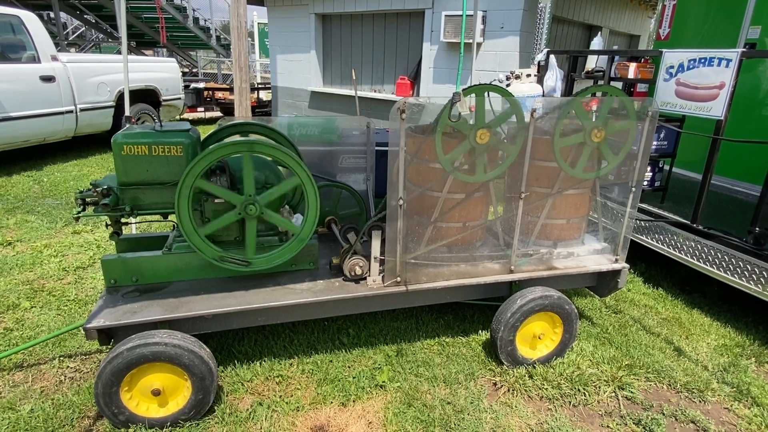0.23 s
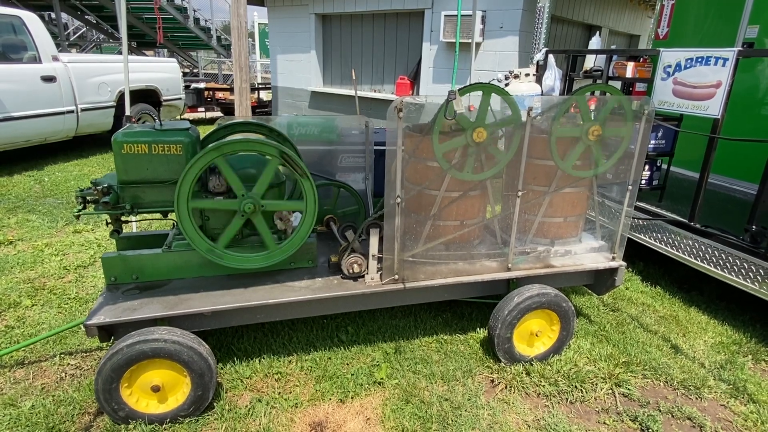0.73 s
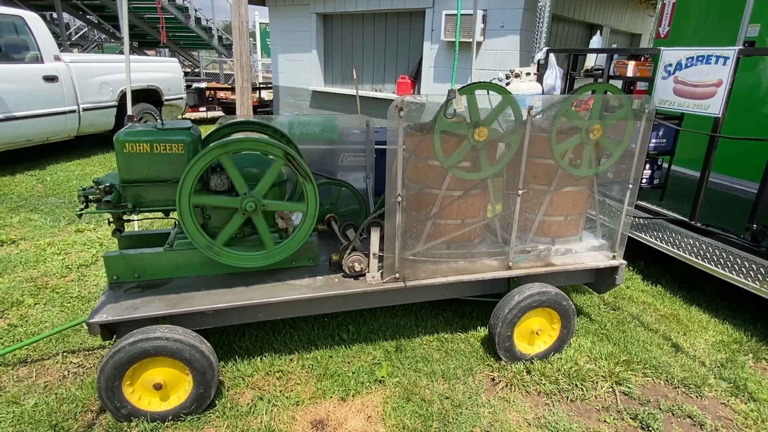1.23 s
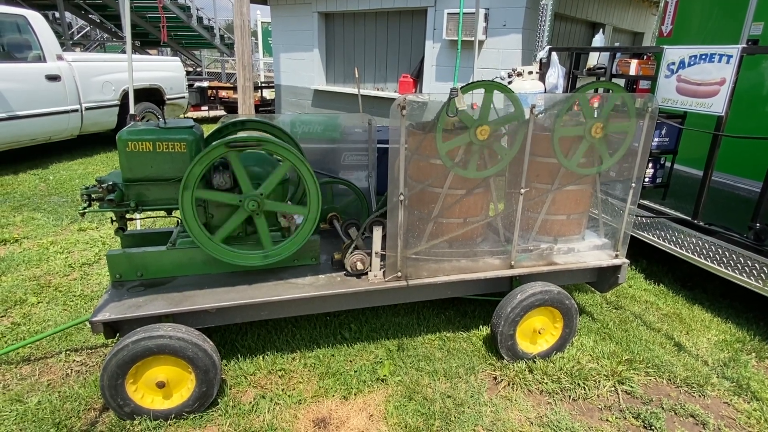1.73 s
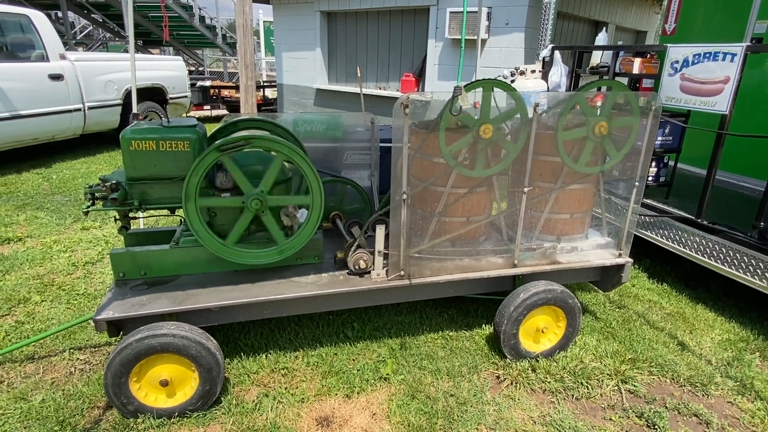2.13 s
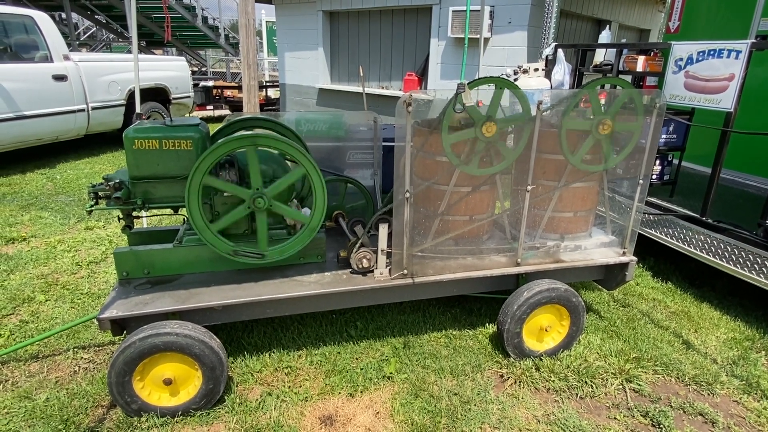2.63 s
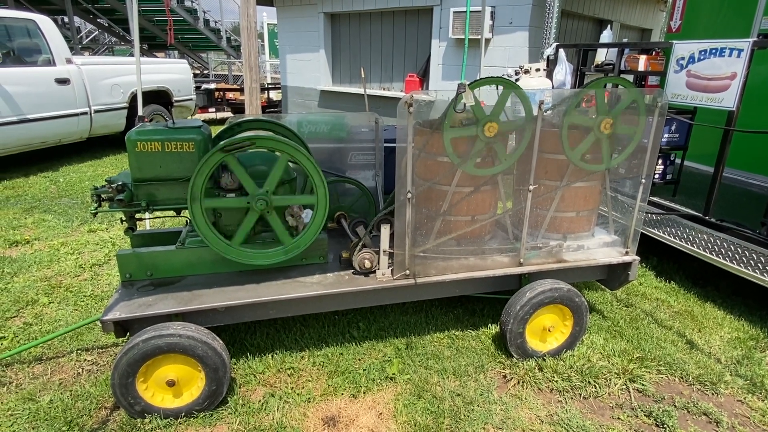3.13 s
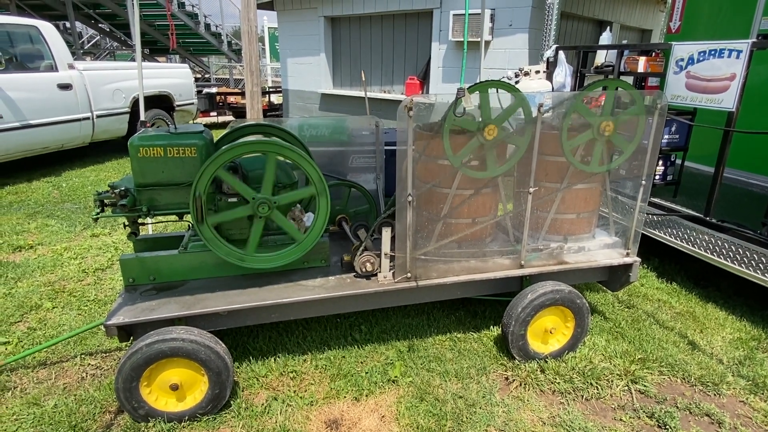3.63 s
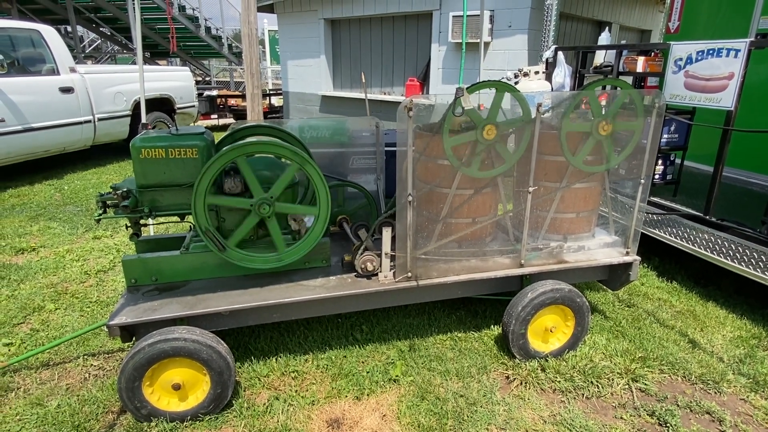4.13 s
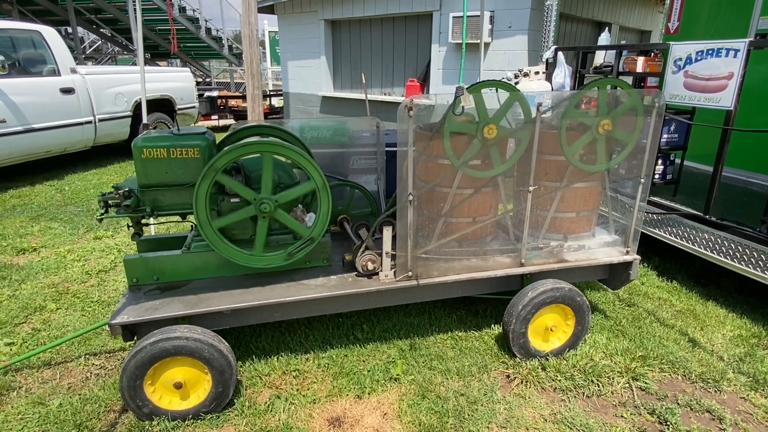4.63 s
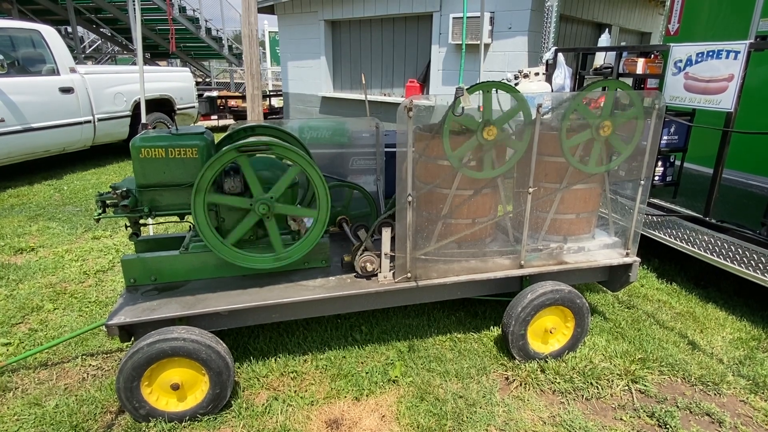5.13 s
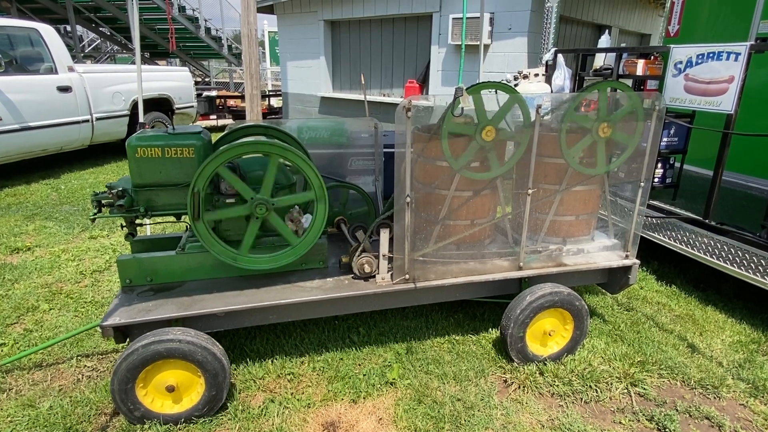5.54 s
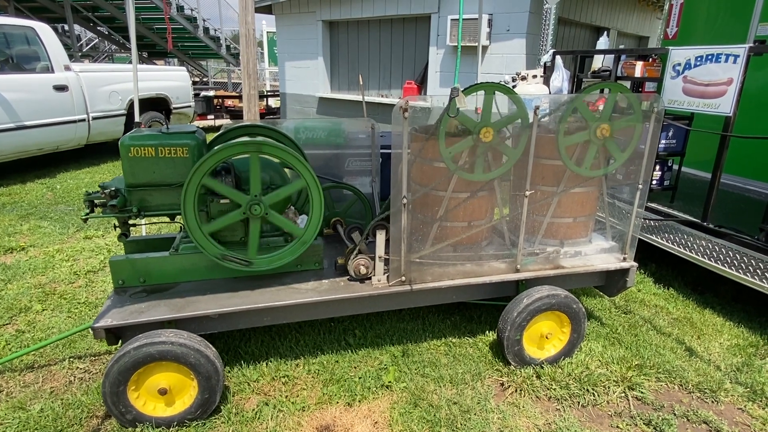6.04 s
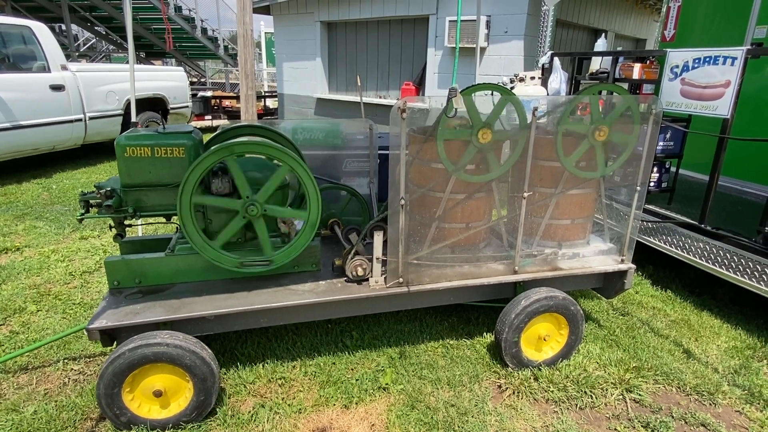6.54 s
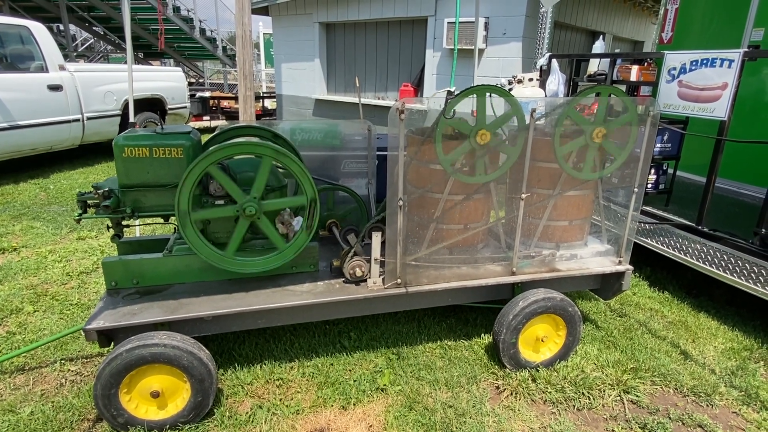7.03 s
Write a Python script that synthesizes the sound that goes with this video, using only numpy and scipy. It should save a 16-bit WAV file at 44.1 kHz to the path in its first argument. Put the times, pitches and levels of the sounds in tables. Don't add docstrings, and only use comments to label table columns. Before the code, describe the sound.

An old single-cylinder engine coasts outdoors with rapid breathy chuffs, three times sucking in air, snapping and blasting exhaust, over a diesel idle.

```python
import sys
import numpy as np
from scipy import signal
from scipy.fft import rfft, irfft, next_fast_len
from scipy.io import wavfile
from scipy.ndimage import uniform_filter1d, minimum_filter1d, map_coordinates

SR = 44100
rng = np.random.default_rng(int(sys.argv[2]) if len(sys.argv) > 2 else 0)


def persist_wave(psi):
    counts = np.round(np.clip(psi, -1, 1) * 32767).astype(np.int16)
    wavfile.write(sys.argv[1], SR, np.atleast_2d(counts).T)


def to_linear_factor(level_db):
    exponent = np.asarray(level_db, float) / 20
    return 10 ** exponent


N = 321048


def unit(x):
    return x / np.sqrt(np.mean(x ** 2) + 1e-20)


def along(points, hz):
    f, v = np.transpose(points)
    return np.interp(np.log(hz + 1), np.log(f + 1), v)


def curves(rows):
    s, *cols = np.transpose(rows)
    return [np.interp(np.arange(N) / SR, s, c) for c in cols]


def wobble(rate_hz):
    knots = rng.standard_normal(int(N * rate_hz / SR) + 4)
    return map_coordinates(knots, [np.arange(N) * rate_hz / SR])


def filtered(x, response):
    m = next_fast_len(N + 8192)
    return irfft(rfft(x, m) * response(np.fft.rfftfreq(m, 1 / SR)), m)[..., :N]


def modes(table, f):
    total = 0
    for k, (c, width, db) in enumerate(table):
        total = total + (-1) ** k * to_linear_factor(db) * 1j * f * width / (c * c - f * f + 1j * f * width)
    return total


def air(response, grain_db):
    grain = to_linear_factor(grain_db * wobble(900))
    return unit(filtered(rng.standard_normal((2, N)) * grain, response))


def gate(start_s, rise_s, hold_s, t60_s):
    t = np.arange(N) / SR - start_s
    return np.clip(t / rise_s, 0, 1) ** 2 * to_linear_factor(-60 * np.clip(t - hold_s, 0, None) / t60_s)


def knock(start_s, hz, sweep, fall_s, t60_s):
    t = np.clip(np.arange(N) / SR - start_s, 0, .2)
    phase = 2 * np.pi * hz * (t + sweep * fall_s * (1 - np.exp(-t / fall_s)))
    return np.sin(phase) * to_linear_factor(-60 * t / t60_s) * (t < .2)


# t/s, level/dB
LOAD = [(0, -33), (.3, -35.5), (.62, -40), (1, -38), (1.3, -38.5), (1.5, -36), (2.13, -33.5), (2.3, -46),
        (3.3, -45.5), (4.44, -49.5), (5.2, -34.5), (5.7, -33), (6.08, -33.5), (6.26, -42), (6.58, -30),
        (6.77, -38.5), (7.28, -46)]
# t/s, level/dB
YARD = [(0, -38.5), (.9, -41.5), (1.1, -42.5), (2.3, -40.5), (2.62, -49), (3.2, -50), (3.45, -52),
        (3.75, -52.5), (4.25, -56), (4.7, -56.5), (5.4, -45), (5.7, -40), (5.9, -42), (6.3, -41),
        (6.6, -41), (7.28, -50)]


def busy():
    return curves(LOAD)[0] + 40, curves(YARD)[0] + 47


# first stroke t/s, slowing/(s per turn squared)
COASTS = [
    (-1.842, .00068),
    (.8489, .00068),
    (3.5541, .00075),
    (5.9792, .00063),
]


def strokes():
    turn_s = .12312
    turn = np.arange(24)
    ends = [row[0] for row in CHARGES] + [N / SR + turn_s]
    times, turns = [], []
    for (first_s, slowing), end in zip(COASTS, ends):
        run = first_s + turn_s * turn + slowing * turn ** 2
        times.append(run[run < end])
        turns.append(turn[run < end])
    return np.concatenate(times), np.concatenate(turns)


# t/s, flow/dB, whistle/dB
BREATHING = [(0, -27, -3), (.3, -28, -4), (.45, -29, 1.5), (.97, -26, 0.5), (1.35, -27, -4.5),
             (2.1, -28.5, -2), (3.1, -27, -5.5), (3.8, -26, -4.5), (4.25, -29, -8), (4.85, -31.5, -8.5),
             (5.15, -29, -5.5), (5.6, -29.5, -4), (6.2, -25, -7), (7.28, -28.5, -7)]
# f/Hz, level/(dB per Hz)
BREATH = [(300, -41), (1000, -4.5), (2000, 0.5), (4000, 0), (6500, -3.5), (8800, -1.5), (12000, -6.5),
          (15700, -18.5), (16000, -60)]
# f/Hz, width/Hz, level/dB
PORT = [(3460, 100, -34), (5460, 83, -7), (6880, 130, -0.5)]
# f/Hz, width/Hz, level/dB
PIPE = [(506, 59, 5.5), (930, 145, 4.5), (1283, 105, 3.5), (1807, 56, 7), (2640, 900, -12)]
# f/Hz, width/Hz, level/dB
WHISTLE = [(4630, 113, 0.5), (4712, 110, -2), (4990, 210, -2.5)]


def coasting():
    s, turn = strokes()
    t = np.arange(N) / SR
    level_db, whistle_db = (np.interp(s, t, c) for c in curves(BREATHING))
    level_db = level_db - 4 * (turn == 0)
    pipe_db = .55 * np.interp(s, t, busy()[1]) - 5.5 * (turn % 2 == 0)

    near = np.round(np.interp(t, s, np.arange(len(s)))).astype(int)
    u = t - s[near]
    push = np.exp(-np.abs(u / np.where(u < 0, .021, .025)) ** np.where(u < 0, 4.5, 2.2))
    edge = np.exp(-np.abs((u + .005) / .02) ** 3.5) + .2 * np.exp(-((u - .04) / .03) ** 2)
    draw = np.exp(-((np.abs(u) - .068) / .031) ** 2) * np.where(u < 0, .8, 1.05)

    jet = air(lambda f: to_linear_factor(along(BREATH, f)) * (1 + np.abs(modes(PORT, f))), grain_db=-2.5)
    back = air(lambda f: to_linear_factor(along(BREATH, f)) * f / 8000, grain_db=-2.5)
    pipe = to_linear_factor(pipe_db[near] - 2) * air(lambda f: modes(PIPE, f), grain_db=0)
    whistle_gain = to_linear_factor(whistle_db[near] + 1.5 + .44 * wobble(50))
    whistle = whistle_gain * air(lambda f: modes(WHISTLE, f), grain_db=-4)
    gain = to_linear_factor(uniform_filter1d(level_db[near], size=400) - 6)
    return gain * to_linear_factor(wobble(70)) * (push * (jet + pipe) + edge * whistle + to_linear_factor(-7) * draw * back)


# order, level/dB
IDLE_LOW = [(4, 9.5), (5, 2), (6, -46), (7, 4)]
# order, level/dB
IDLE_BOOM = [(8, -6), (9, -16.5), (10, -10), (11, -2), (12, 0.5), (13, -14), (14, -24), (20, -32.5),
             (22, -17)]
# t/s, level/dB
THROB = [(0, -37), (.55, -36), (1, -45.5), (3.2, -45), (3.9, -50), (5.6, -50), (6.1, -45), (7.28, -50)]


def diesel():
    idle_hz = 13.46
    cycle = 2 * np.pi * idle_hz * np.arange(N) / SR + .041 * wobble(3.17)

    def stack(table):
        total = 0
        for order, db in table:
            gain = to_linear_factor(db + .35 * wobble(2.59))
            total = total + gain * np.sin(order * cycle + rng.uniform(0, 2 * np.pi))
        return unit(total)

    def engine():
        return to_linear_factor(curves(THROB)[0]) * stack(IDLE_LOW) + to_linear_factor(curves(LOAD)[0] - 1) * stack(IDLE_BOOM)

    return np.array([engine(), .23 * engine()])


# f/Hz, level/(dB per Hz)
RUMBLE = [(30, -25), (50, -10), (85, -4), (160, -6.5), (230, -7.5), (380, -8.5), (550, -33.5)]
RATTLE = [(330, -20.5), (520, -1), (680, 0), (850, 1.5), (1050, -5.5), (1400, -37)]
WHIRR = [(900, -9), (1350, 3), (1650, -0.5), (2300, -2.5), (2750, -5.5), (4000, -6.5), (6500, -6.5),
         (9000, -22)]
HISS = [(4000, -17), (7000, -4), (9000, 13), (11000, 3), (15700, -1), (16000, -50)]


def around():
    load_db, yard_db = busy()
    rumble_db = -45.5 + .45 * load_db + .46 * yard_db + 1.74 * wobble(25)
    rattle_db = -43 + yard_db + 2.03 * wobble(40)
    whirr_db = -36.5 + .44 * yard_db + .05 * load_db + 1.2 * wobble(15)
    hiss_db = -49.5 - .73 * yard_db + .54 * wobble(17)
    rumble = to_linear_factor(rumble_db) * air(lambda f: to_linear_factor(along(RUMBLE, f)), grain_db=2)
    rattle = to_linear_factor(rattle_db) * air(lambda f: to_linear_factor(along(RATTLE, f)), grain_db=1)
    whirr = to_linear_factor(whirr_db) * air(lambda f: to_linear_factor(along(WHIRR, f)), grain_db=1.54)
    hiss = to_linear_factor(hiss_db) * air(lambda f: to_linear_factor(along(HISS, f)), grain_db=5.5)
    return rumble + rattle + whirr + hiss


# t/s, first gulp level/dB, second gulp level/dB, tube tone level/dB, tone f/Hz
CHARGES = [
    (0.484, -12, -10, -11, 2250),
    (3.179, -15.5, -12, -37, 1300),
    (5.609, -13.5, -12.5, -15, 1350),
]
# delay/s, level under the gulps/dB, rise/s, open time/s
BOUNCES = [
    (0.0588, -4, 0.001, 0.0043),
    (.087, -15.5, 0.0011, 0.0017),
]
# f/Hz, level/(dB per Hz)
SUCK = [(200, -9.5), (500, -10), (1500, -13.5), (3600, -11), (8800, -14), (15500, -9), (16800, -41),
        (17050, -90)]
# f/Hz, width/Hz, level/dB
THROAT = [(2100, 560, 11.5), (5250, 1060, 8), (6760, 910, 12), (10900, 1100, 4)]


def intake():
    gulp_gap_s, gulp_t60_s = .033, .015
    flow = tone = 0
    for s, first_db, second_db, tone_db, hz in CHARGES:
        gulps = [(s, first_db, .0035, .024), (s + gulp_gap_s, second_db, .0061, .018)]
        for late_s, db, rise_s, open_s in BOUNCES:
            gulps.append((s + late_s, (first_db + second_db) / 2 + db, rise_s, open_s))
        for start_s, db, rise_s, open_s in gulps:
            flow = flow + to_linear_factor(db - 5) * gate(start_s, rise_s, open_s, gulp_t60_s)
        tube = air(lambda f: modes([(hz, .18 * hz, 0)], f), grain_db=6.5)
        tone = tone + to_linear_factor(tone_db - 13) * gate(s, .011, .05, .1) * tube
    suck = air(lambda f: to_linear_factor(along(SUCK, f)) * (1 + np.abs(modes(THROAT, f))), grain_db=1.5)
    return tone + flow * suck * to_linear_factor(.33 * wobble(200))


# t/s, peak level/dB, f/Hz, crack level/dB, left-right/dB
POPS = [(0.522, -21, 796, 6, 2), (0.551, -21.5, 463, -2, -1.5), (0.942, -31, 643, -4, -6),
        (0.982, -20, 606, -9, -0.5), (1.081, -29, 810, -4, 0.5), (1.137, -33, 840, -7, -0.5),
        (1.854, -32, 840, -4, -1.0), (1.92, -28, 533, -5, 6), (2.32, -25, 452, -13, 3),
        (2.334, -39, 740, -6, -2.5), (2.349, -18.5, 600, -15, 0.5), (2.363, -21.5, 480, -1, 7),
        (2.41, -28, 360, 0, 0.5), (2.451, -25, 480, 4, 2), (2.531, -31, 611, -4, 10),
        (2.554, -32, 637, -7, 14), (2.573, -28, 364, -7, 6), (2.591, -40, 511, -4, 1.5),
        (2.983, -26.5, 680, -7, 1.0), (3.117, -28.5, 426, -1, 12), (3.155, -18.5, 683, 15.5, 7.5),
        (3.221, -30, 456, 0, 14), (3.68, -34, 714, 3, 5), (5.267, -39, 500, 4, 0)]


def pops():
    dry = 0
    for s, db, hz, crack_db, pan_db in POPS:
        ring = to_linear_factor(.5) * knock(s, .724 * hz, .77, .0045, .023)
        crack = to_linear_factor(crack_db - 7) * knock(s, 1260, 4.85, .000485, .014)
        dry = dry + to_linear_factor(db + np.array([[.5], [-.5]]) * pan_db) * (ring + crack)
    return filtered(dry, lambda f: 1 / (1 + (f / 6500) ** 6))


# t/s, peak level/dB, ring level/dB
TRIPS = [
    (0.609, -5, -10),
    (3.308, -6, -15),
    (5.7362, -7.5, -7),
]
# f/Hz, level/(dB per Hz)
SNAP = [(500, -14), (1200, -10), (1900, 4.5), (2800, -2), (4600, 7.5), (8000, 1), (16800, -6), (17050, -80)]
# f/Hz, level/dB, t60/s
STEEL = [(1950, -5, .03), (4620, -19, 0.06), (5230, -14, .04), (6200, -24, 0.08), (10200, -16, 0.07),
         (10680, -1, 0.11), (11000, -12, .06)]


def igniter():
    t = np.arange(N) / SR
    shake = wobble(160)
    crack = ring = 0
    for s, db, ring_db in TRIPS:
        blow = gate(s, .0016, .0026, .028) + .16 * gate(s, .00045, .0067, .22)
        crack = crack + to_linear_factor(db - 6) * blow
        for hz, level, t60_s in STEEL:
            gain = to_linear_factor(db + ring_db + level + rng.normal(0, 1.9))
            ring = ring + gain * gate(s, .00055, 0, t60_s) * np.sin(2 * np.pi * hz * t + shake)
    return crack * air(lambda f: to_linear_factor(along(SNAP, f)), grain_db=3.5) + ring * [[1], [0]]


# t/s, peak level/dB, full flow/s, thump level/dB
BLASTS = [
    (0.674, -3, 0.017, -17),
    (3.373, -4.5, 0.015, -20),
    (5.802, -3, 0.017, -5),
]
# level/dB, lower f/Hz, upper f/Hz
HOOTS = [
    (-18.5, 531, 850),
    (-29.5, 580, 2400),
    (-19.5, 1230, 1910),
]
# f/Hz, level/(dB per Hz)
BLAST = [(200, -35), (850, -6.5), (3500, -1), (7000, -3), (12000, 0.5), (15000, 0), (16800, -26),
         (17050, -80)]
# f/Hz, width/Hz, level/dB
JET = [(2130, 460, -3), (3480, 1200, -6.5), (5000, 680, 3), (7500, 880, -3.5)]


def firing():
    hoot_width_hz = 48
    jet = tone = thump = 0
    for (s, db, flow_s, thump_db), (hoot_db, low, high) in zip(BLASTS, HOOTS):
        jet = jet + to_linear_factor(db - 7.5) * gate(s, .0052, flow_s, .16)
        pair = [(low, hoot_width_hz, 0), (high, hoot_width_hz, 0)]
        hoot = air(lambda f: modes(pair, f), grain_db=2)
        tone = tone + to_linear_factor(hoot_db) * gate(s, .0012, .016, .049) * hoot
        thump = thump + to_linear_factor(db + thump_db) * knock(s, 121, 4.5, .00192, .028)
    roar = air(lambda f: to_linear_factor(along(BLAST, f)) * (1 + np.abs(modes(JET, f))), grain_db=0)
    return jet * roar * to_linear_factor(1.6 * wobble(150)) + tone + thump * [[1], [0]]


# f/Hz, t60/s
FIELD = [(300, 0.23), (2000, 0.19), (10000, 0.13)]


def field(x):
    hz, t, z = signal.stft(rng.standard_normal((2, SR // 3)), SR, nperseg=256)
    tail = signal.istft(z * to_linear_factor(-60 * t / along(FIELD, hz)[:, None]), SR, nperseg=256)[1]
    late = np.pad(x, (300, 0))[None]
    return signal.fftconvolve(late, tail / np.linalg.norm(tail[0]), axes=1)[:, :N]


def patchy(x, depth_db):
    z = signal.stft(x, nperseg=512)[2]
    patches = uniform_filter1d(rng.standard_normal(z.shape[1:]), size=3, axis=0)
    patches = uniform_filter1d(patches, size=10, axis=1)
    return signal.istft(z * to_linear_factor(depth_db * unit(patches)), nperseg=512)[1][:, :N]


# f/Hz, left-right/dB
TILT = [(60, -7), (200, -6.5), (400, 0), (6500, -0.5), (7600, -4.5), (8000, -4), (9600, -7), (10600, 0)]
# f/Hz, likeness/(0-1)
ALIKE = [(100, 0.98), (400, 0.13), (1000, 0.98), (2000, 0.23), (3800, 0.078), (6000, 0.68), (9000, 0.18),
         (10800, 1), (12500, 0.9), (16000, 0.77)]
# f/Hz, phase/rad
LEAD = [(200, 0.59), (500, 2.42), (1250, 1.69), (2200, 3.53), (4300, 6.13), (6400, 12.12), (11000, 18.6),
        (12300, 17.2), (12800, 5 * np.pi), (13650, 5 * np.pi), (14000, 14.4), (15200, 4 * np.pi)]


def ports(pair):
    def share(f):
        angle = np.arccos(np.clip(along(ALIKE, f), 0, 1)) / 2
        return np.array([np.cos(angle), np.sin(angle)])

    side = np.array([[1], [-1]])
    hz, rad = np.transpose(LEAD)

    def offset(f):
        return to_linear_factor(side * along(TILT, f) / 2) * np.exp(.5j * side * np.interp(f, hz, rad))

    a, b = filtered(pair, share)
    return filtered(np.array([a + b, a - b]), offset)


# delay/s, level/dB
EARLY = [(.0013, -13), (.0031, -19.5), (.0047, -7.5), (.0074, -4), (0.011, -16.5)]
# f/Hz, width/Hz, level/dB
SHADOW = [(805, 180, -2.3)]


def scene():
    def comb(f):
        return 1 + sum(to_linear_factor(db) * np.exp(-2j * np.pi * f * s) for s, db in EARLY)

    steady = patchy(filtered(coasting(), comb) + around(), depth_db=1.96) + diesel()
    gas, far, snap = intake() + firing(), pops(), igniter()
    rest = gas + to_linear_factor(-9.5) * field(snap[0] + gas[0] + far[0]) + steady
    turned = np.clip((np.arange(N) / SR - 4.9) / .4, 0, 1)
    rest = rest - turned * filtered(rest, lambda f: modes(SHADOW, f))
    top_hz = 15850
    return ports(snap + filtered(rest, lambda f: f < top_hz)) + far


def low_pass(x):
    return signal.sosfilt(signal.butter(12, 16970, fs=SR, output="sos"), x)


def record(dry):
    power = np.abs(uniform_filter1d(np.mean(dry ** 2, axis=0), size=900))
    over_db = np.clip(10 * np.log10(power + 1e-12) + 17, 0, None)
    held_db = -minimum_filter1d(-over_db, size=4001, origin=2000)
    ramp_db = 55 * np.arange(N) / SR
    duck_db = np.maximum.accumulate(held_db + ramp_db) - ramp_db
    late_db = uniform_filter1d(duck_db, size=2601, origin=1300)
    bass = filtered(dry, lambda f: 1 / (1 + (f / 480) ** 4))
    x = (dry - bass) * to_linear_factor(-.9 * late_db) + bass * to_linear_factor(-1.87 * late_db)
    x = filtered(x, lambda f: (f / 42) ** 4 / (1 + (f / 42) ** 4))
    x = x / (1 + np.abs(x / .75) ** 6) ** (1 / 6)
    return low_pass(x)


dry = scene()
out = record(dry)
persist_wave(out)
```